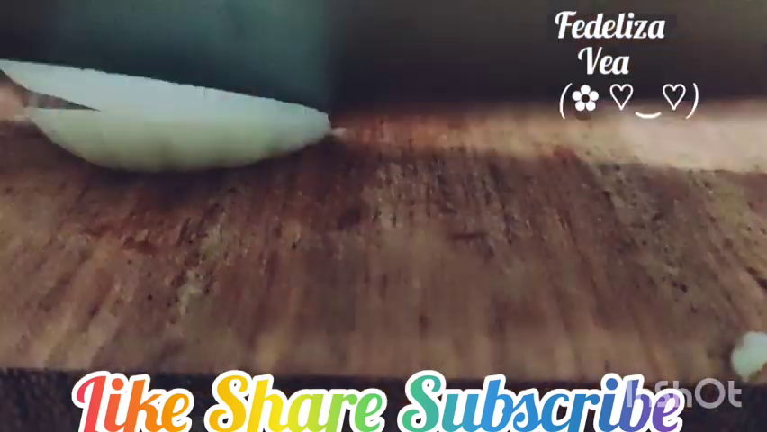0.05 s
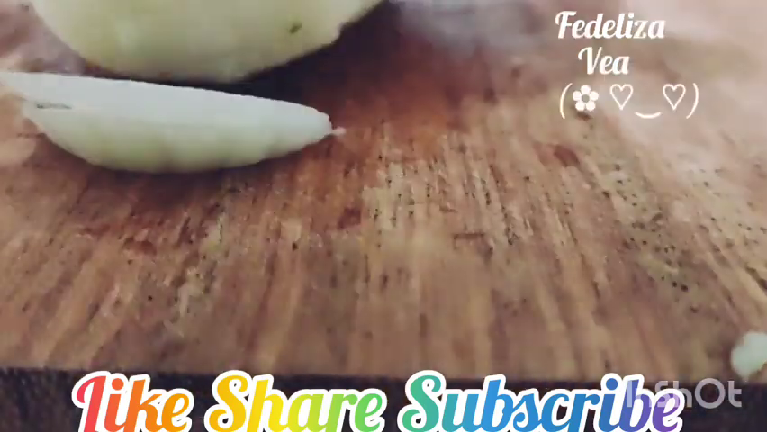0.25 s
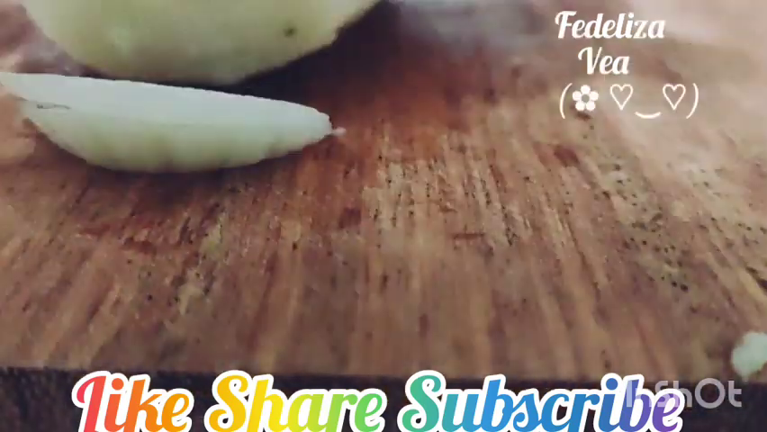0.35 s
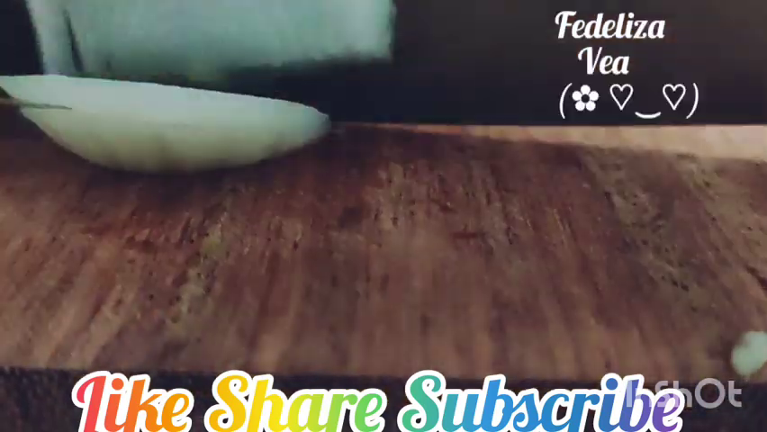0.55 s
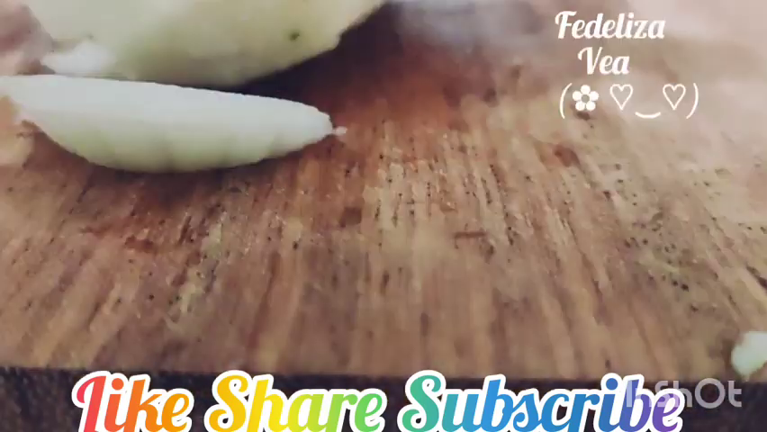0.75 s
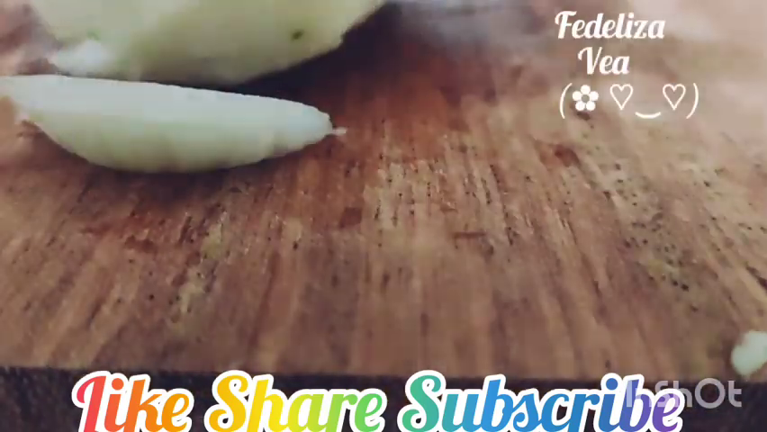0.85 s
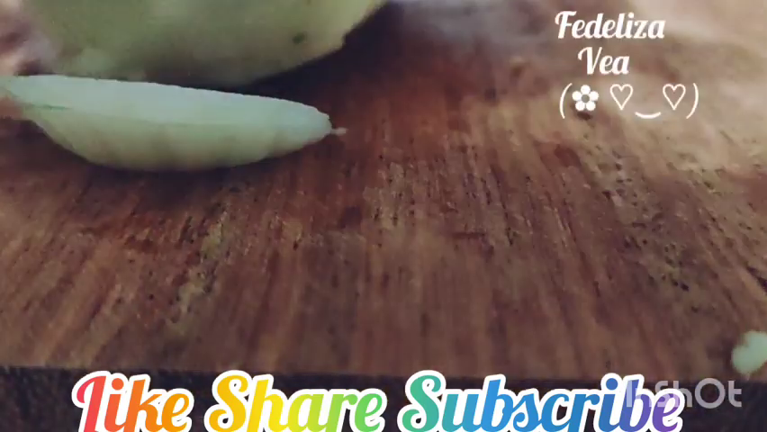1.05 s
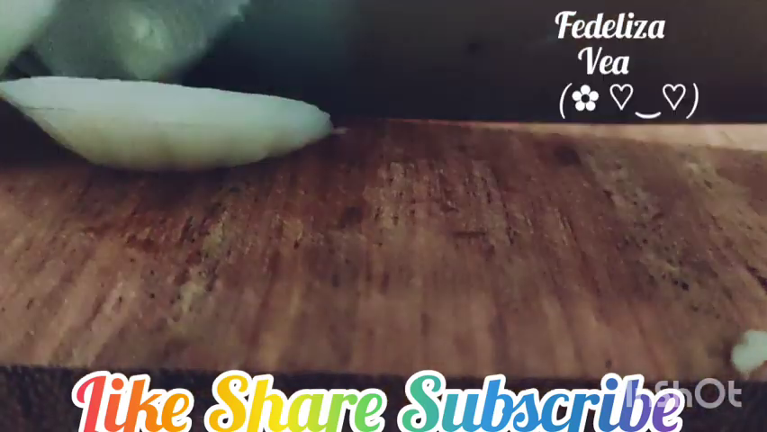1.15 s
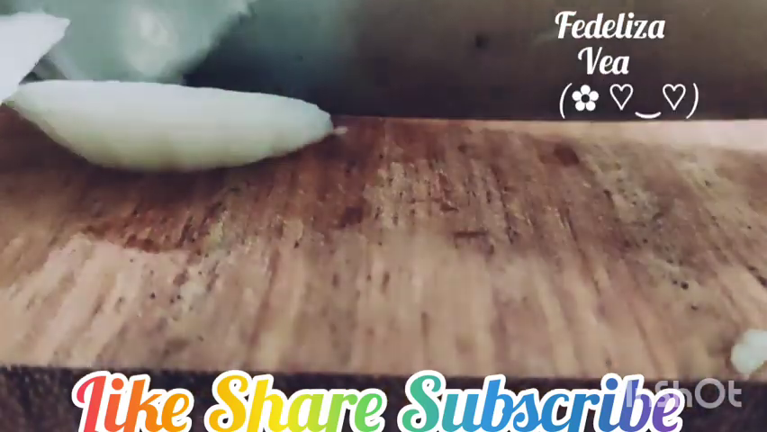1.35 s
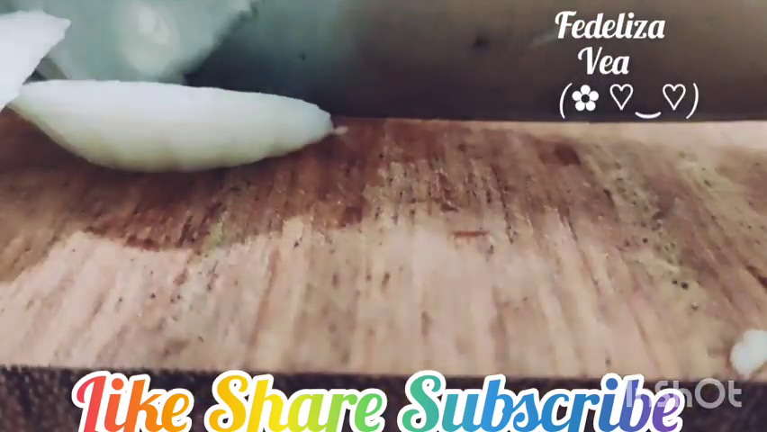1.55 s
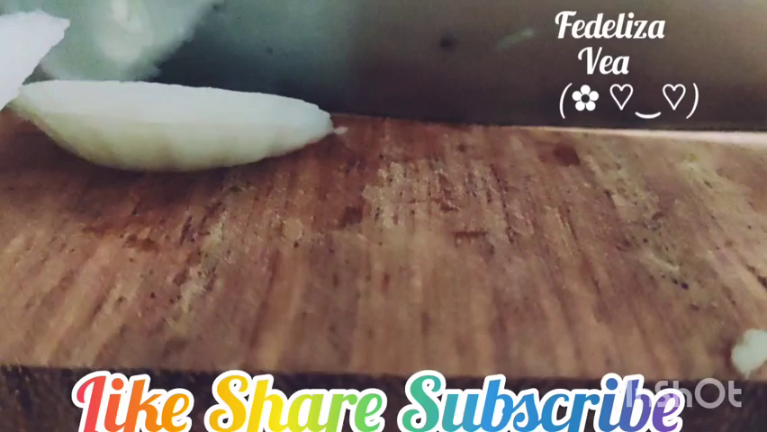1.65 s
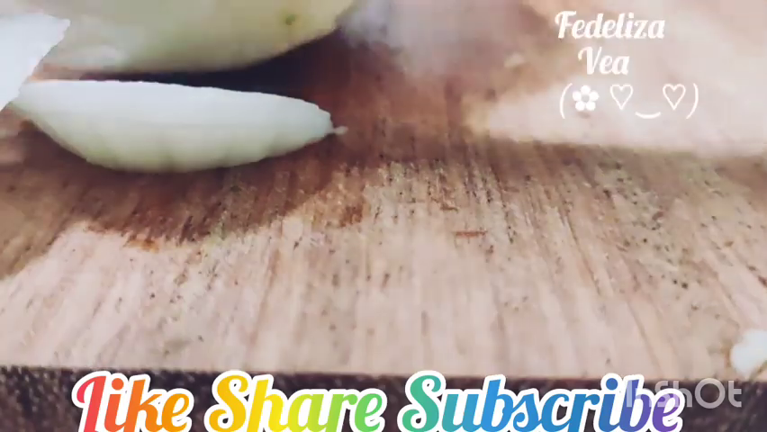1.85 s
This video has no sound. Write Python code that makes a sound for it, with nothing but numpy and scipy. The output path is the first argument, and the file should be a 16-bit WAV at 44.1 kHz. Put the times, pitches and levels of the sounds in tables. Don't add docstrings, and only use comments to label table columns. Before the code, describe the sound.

Close to the board, two crunchy vegetable cuts each end in a hard woody knock and gritty scrape. Slices drop with soft thuds, fingers rustle faintly in peel, and low room hush remains.

```python
import sys
import numpy as np
from scipy import signal
from scipy.io import wavfile
from scipy.ndimage import uniform_filter1d

SR = 44100
rng = np.random.default_rng(int(sys.argv[2]) if len(sys.argv) > 2 else 0)


def gain_from_decibels(decibels):
    exponent = np.asarray(decibels, float) / 20
    return 10 ** exponent


def master(y):
    cut = np.clip(np.atleast_2d(y).T, -1, 1)
    pcm = np.round(cut * 32767)
    wavfile.write(sys.argv[1], SR, pcm.astype(np.int16))


N = 83790
LAG = 9

# (frequency [Hz], width [Hz], level [dB])
BOARD_MODES = [(290, 20, -15), (652.6, 34, -9), (1011.6, 23, -6), (1057.3, 43, 3), (1187, 81, -3),
               (1190, 120, 2), (1366, 200, -11), (1578, 54, -2), (1784.5, 130, -5.5), (1829, 96, -6),
               (2010, 140, -8.5), (2193, 51, -18.5), (798, 53, -15.5)]
# (frequency [Hz], level [dB])
CRUNCH_COLOUR = [(100, -3), (400, -13), (1500, -2.5), (2500, -2.5), (3700, 1), (6000, 4.5), (11000, 5.5),
                 (16500, -9)]


def evened(x):
    return x / np.sqrt(np.mean(x ** 2) + 1e-20)


def colour(x, points):
    f, db = np.transpose(points)
    hz = abs(np.fft.fftfreq(4096, 1 / SR))
    log_gain = np.log(gain_from_decibels(np.interp(np.log(hz + 1), np.log(f), db)))
    minimum_phase = np.exp(log_gain - 1j * signal.hilbert(log_gain).imag)
    taps = np.fft.ifft(minimum_phase).real[:2048]
    return signal.oaconvolve(x, taps[None] if x.ndim > 1 else taps, axes=-1)[..., :N]


def ring(x, modes, low_hz):
    t = np.arange(4000) / SR
    response = np.zeros(len(t))
    for hz, width, db in modes:
        decay = np.exp(-np.pi * width * t)
        soft_start = 1 - np.exp(-4 * np.pi * width * t)
        response += gain_from_decibels(db) * np.sqrt(width) * decay * soft_start * np.sin(2 * np.pi * hz * t)
    response = signal.sosfilt(signal.butter(3, low_hz, "high", fs=SR, output="sos"), response)
    return signal.oaconvolve(x, response[None] / np.linalg.norm(response), axes=1)[:, :N]


def stroke_gain(strokes, column=1):
    t, gain = np.arange(N) / SR, np.zeros(N)
    for rows in strokes:
        r = np.array(rows)
        inside = (t >= r[0, 0]) & (t < r[-1, 0])
        gain[inside] = gain_from_decibels(np.interp(t[inside], r[:, 0], r[:, column]))
    return uniform_filter1d(gain, size=44)


def grains(per_s, spread_db, clump_db, clump_s, shared):
    chance = rng.random((3, N))
    size = np.minimum(rng.exponential(1, (3, N)), 4)
    clump = evened(uniform_filter1d(rng.standard_normal(N), max(int(clump_s * SR), 2)))
    clicks = (chance < per_s / SR) * gain_from_decibels(spread_db * size + clump_db * clump)
    clicks = clicks * rng.choice([-1., 1.], (3, N))
    share = np.clip(shared, 0, 1)
    common = np.array([np.roll(clicks[0], 2 * LAG), clicks[0]])
    mix = np.sqrt(share) * common + np.sqrt(1 - share) * clicks[1:]
    bass_source = np.array([np.roll(clicks[0], LAG), clicks[0]])
    return evened(mix + signal.lfilter(*signal.butter(2, 600, fs=SR), bass_source - mix))


def add(mix, s, sound):
    part = mix[:, max(round(s * SR), 0):][:, :sound.shape[1]]
    part += sound[:, :part.shape[1]]


def hush():
    # (frequency [Hz], level [dB])
    hush_colour = [(25, -20), (80, 1), (210, 4), (800, -11.5), (1200, -18.5), (4000, -23), (9000, -20),
                   (16000, -29)]
    # (frequency [Hz], width [Hz], level [dB])
    machine_tones = [(222.6, 23, -0.5), (130, 6.9, -4.5), (823, 30, -8.5)]
    noise = rng.standard_normal((3, N))
    low = signal.lfilter(*signal.butter(2, 700, fs=SR), noise)
    hiss = noise[:2] - low[:2]
    mix = hiss + np.sqrt(.93) * low[2] + np.sqrt(.07) * low[:2]
    waver = evened(uniform_filter1d(rng.standard_normal(N), 1500))
    gain = gain_from_decibels(-54 + 1.7 * waver - 1.5 * np.arange(N) / SR)
    return gain * (evened(colour(mix, hush_colour)) + gain_from_decibels(-9.5) * evened(ring(mix, machine_tones, 68.8)))


def kitchen(x):
    t = np.arange(SR // 3) / SR
    tail = rng.standard_normal((2, len(t))) * gain_from_decibels(-60 * t / 0.3) * (t > .004)
    tail = signal.lfilter(*signal.butter(1, [500, 4000], "band", fs=SR), tail)
    return signal.fftconvolve(x, tail / np.linalg.norm(tail[0]), axes=1)[:, :N]


def rustles():
    rustle_times = (.085, .14, .19, .62, .692, .732, 1.262, 1.468, 1.51, 1.567, 1.664, 1.677, 1.848, 1.2)
    # (level [dB], length [s])
    puffs = [(-45.5, 0.081), (-67, .04), (-58, 0.019), (-49.5, 0.068), (-48, 0.0058), (-53, 0.056),
             (-54, 0.095), (-56.5, 0.012), (-57.5, 0.027), (-52, 0.062), (-65.5, 0.0073), (-57.5, 0.012),
             (-58, 0.029), (-58, 0.022)]
    # (frequency [Hz], level [dB])
    peel_colour = [(300, -19.5), (1000, -1.5), (2500, -3.5), (4000, -2), (6000, 3), (11000, 1),
                   (16000, -11)]
    t, swell = np.arange(N) / SR, np.zeros(N)
    for s, (db, length) in zip(rustle_times, puffs):
        swell += gain_from_decibels(db) * np.exp(-(2 * (t - s) / length) ** 2)
    return swell * evened(colour(grains(8000, 1.5, 1.38, 0.00395, 0.058), peel_colour))


def thuds():
    thud_times = (.038, .583, .79, .72, 1.83, .92)
    # (level [dB], pitch [Hz], length [s])
    falls = [(-44.5, 215, 0.035), (-43, 198, 0.046), (-50.5, 356, 0.021), (-55, 210, .03),
             (-66, 350, 0.0446), (-53.5, 240, 0.034)]
    out = np.zeros((2, N))
    for s, (db, hz, length) in zip(thud_times, falls):
        t = np.arange(0, length, 1 / SR)
        swing = np.zeros(len(t))
        for k in (1, 1.7, 2.3):
            swing += np.sin(2 * np.pi * k * hz * t * (1 - .2 * t / length)) / k ** 2.5
        swing *= np.sin(np.pi * t / length) ** 1.5
        add(out, s, gain_from_decibels(db + 9) * swing * gain_from_decibels([[-1.5], [1.5]]))
    return out


def sings():
    # (time [s], level [dB], frequency [Hz],
    # time to fall by 60 dB [s])
    thin_tones = [(0.067, -53, 6120, 0.16), (0.134, -64, 6120, 0.15), (.615, -66, 5300, 0.2),
                  (0.723, -61, 5970, 0.2), (1.673, -66, 4750, .12), (1.466, -67, 6090, 0.08),
                  (1.503, -67, 6200, 0.14), (.9695, -35, 4800, .045), (1.562, -67, 950, .08),
                  (.657, -62, 2850, .04)]
    out, t = np.zeros((2, N)), np.arange(6000) / SR
    for (s, db, hz, t60), z in zip(thin_tones, rng.standard_normal((len(thin_tones), 6000))):
        waver = 1 + 0.42 * evened(uniform_filter1d(z, 150))
        tone = np.sin(2 * np.pi * hz * t) * waver
        add(out, s, gain_from_decibels(db + 7.0 - 60 * t / t60) * np.minimum(t / 0.0031, 1) * tone * np.ones((2, 1)))
    return out


def snaps():
    snap_times = (.2105, .2495, .266, .2745, .288, .329, .3522, .3691, .659, .7245, .7698, .7711, .7795,
                  .7908, .857, .8805, .9405, .9690, .9708, 1.0495, 1.249, 1.258, 1.555, 1.5705, 1.654,
                  1.672)
    # (peak level [dB], board share [dB])
    snap_levels = [(-50.5, 3.5), (-40.5, 10), (-41, 4), (-33, -11.5), (-29, -10), (-37.5, -3.5), (-39.5, -1.5),
                   (-35.5, -22.5), (-69, 17), (-56, -11.5), (-32, 3), (-39, 9), (-43.5, 6.5), (-40.5, 9),
                   (-51.5, -15), (-38.5, -9.5), (-36.5, -20), (-21.5, -14), (-46.5, -20), (-23.5, -13),
                   (-68, -19), (-52, -11.5), (-59, -19.5), (-55, -23.5), (-63, -22.5), (-55.5, -27.5)]
    air, wood, t = np.zeros((2, N)), np.zeros((2, N)), np.arange(300) / SR
    burst = (np.exp(-(t / .0011) ** 4) + .2 * gain_from_decibels(-60 * t / .012)) * np.minimum(t / .0003, 1)
    quick = gain_from_decibels(-60 * t / .006)
    for s, (db, share_db), z in zip(snap_times, snap_levels, rng.choice([-1., 1.], (len(snap_levels), 2, 300))):
        add(air, s, gain_from_decibels(db) * burst * z)
        add(wood, s, gain_from_decibels(db + share_db) * burst * quick * z)
    blade = ring(air, [(4770, 170, -5), (6475, 360, -1), (7300, 900, -1.5)], 2010)
    body = ring(wood, [(1680, 240, 7.0), (3350, 700, 9), (1110, 800, -3.5), (2430, 680, -4)], 250)
    return gain_from_decibels(8.0) * blade + gain_from_decibels(8.0) * colour(air, CRUNCH_COLOUR) + gain_from_decibels(16.5) * body


def knocks():
    # (time [s], peak level [dB])
    hits = [
        (0.4091, 4),
        (1.061, 1.5),
    ]
    # (frequency [Hz], level [dB], time to fall by 60 dB [s])
    struck_modes = [(1005, -7.5, .025), (1160, -8, 0.03), (1720, -26, .02), (2820, -19, 0.015),
                    (2340, -10.5, 0.0075), (4140, -13.5, 0.013), (615, -22.5, 0.011), (6200, -29, 0.023),
                    (4830, -11.5, .01)]
    push_lengths = (.00007, .00010)
    bright_db, bounce = (3, -5.5), (0.31, 0.032)
    out, t = np.zeros((2, N)), np.arange(2000) / SR
    choke = .06 + .94 * np.exp(-(t / .003) ** 4)
    for s, db in hits:
        for ch in range(2):
            modes = np.zeros(len(t))
            for hz, d, t60 in struck_modes:
                modes += gain_from_decibels(d + bright_db[ch] * (hz > 1900) - 60 * t / t60) * np.sin(2 * np.pi * hz * t)
            modes = np.roll(modes * choke, 18) * (t > 18 / SR)
            push = np.exp(-((t - 12 / SR) / push_lengths[ch]) ** 2)
            hit = gain_from_decibels(-5.5) * modes - push
            hit = hit + bounce[ch] * np.roll(hit, 78) * (t > 78 / SR)
            low = -gain_from_decibels(-42.5 + 4.5 * ch) * np.sin(np.pi * np.clip(t / 0.0037, 0, 1))
            out[ch, round(s * SR) + LAG * (1 - ch):][:len(t)] += gain_from_decibels(db) * (hit + low)
    return out


def dragging():
    # (time [s], pressure level [dB])
    drags = [
        [(0, -31.5), (.008, -36.5), (.02, -39), (.034, -36), (.052, -53.5), (.084, -54), (.17, -75)],
        [(.411, -24), (.43, -22.5), (.446, -22), (.462, -30), (.484, -36.5), (.498, -26.5), (.54, -37),
         (.6, -59.5), (.66, -59.5)],
        [(1.063, -29), (1.082, -26.5), (1.105, -27), (1.125, -25), (1.143, -24), (1.162, -36), (1.22, -44),
         (1.232, -61), (1.32, -77)],
    ]
    # (frequency [Hz], level [dB])
    grit_colour = [(500, -30), (1300, -4), (2600, -4.5), (5000, -8.5), (7000, -12), (9000, -27.5),
                   (11500, -22.5), (16000, -40)]
    patch_shifts = (-.03, 0, .03)
    pressure = stroke_gain(drags)
    drive = grains(3000, 1.6, 2.6, 0.011, 0.5) * pressure
    wander = uniform_filter1d(rng.standard_normal((len(patch_shifts), N)), size=600, axis=1)
    touched = np.argmax(wander, axis=0)
    wood = np.zeros((2, N))
    for k, shift in enumerate(patch_shifts):
        modes = [(hz * (1 + shift * (hz > 900)), width, db) for hz, width, db in BOARD_MODES]
        wood += ring(drive * (touched == k), modes, 150)
    grit = colour(abs(pressure) ** 0.64 * grains(9000, 2., 1.2, 0.0043, 0.29), grit_colour)
    return gain_from_decibels(3) * (wood + gain_from_decibels(-12.0) * grit)


def slicing():
    # (time [s], crunch level [dB], board share [dB])
    strokes = [
        [(.209, -40, 10), (.232, -32, -2.5), (.264, -28.5, -6), (.3, -34.5, -21.5), (.338, -35, -11),
         (.37, -32, -25), (.39, -36, -18), (.4095, -32, -8.5)],
        [(.756, -45, 4), (.763, -38.5, -1), (.7692, -42, -9.5), (.771, -29.5, -6), (.804, -31.5, -9),
         (.862, -33, -10), (.95, -34, -40), (1.016, -33.5, -19), (1.045, -33, -12.5), (1.0615, -29, -12.5)],
    ]
    # (frequency [Hz], width [Hz], level [dB])
    blade_modes = [(4580, 90, -15.5), (5620, 15, -3.5), (6230, 77, 4), (6490, 40, -3), (7000, 34, -5)]
    go = stroke_gain(strokes)
    tears = abs(grains(120, 8.2, 0.97, 0.067, 0.96))
    tears = signal.oaconvolve(tears, np.hanning(90)[None], "same", axes=1)
    cells = grains(12000, 2.6, 1.5, 0.0049, 0.044) * (1 + evened(tears) / 8)
    crunch = evened(colour(cells, CRUNCH_COLOUR)) * go
    crunch = crunch + gain_from_decibels(-14) * ring(cells * go, blade_modes, 3000)
    shaking = grains(4900, 6.1, 6.9, 0.0035, 0.18) * go * stroke_gain(strokes, column=2)
    push = ring(shaking, BOARD_MODES + [(1730, 280, 6)], 150)
    return gain_from_decibels(4.5) * (crunch + gain_from_decibels(-7) * push)


def scene():
    near = slicing() + dragging() + knocks() + snaps() + thuds() + rustles() + sings()
    return near + gain_from_decibels(-16) * kitchen(near) + hush()


def roll_off(x):
    return signal.sosfilt(signal.butter(12, 16940, fs=SR, output="sos"), x)


def record(dry):
    # (frequency [Hz], level [dB])
    left_port = [(30, -12), (300, -7), (4000, -4), (6100, -0.5), (7300, -4.5), (8500, -20.5), (10500, -49),
                 (15000, -13.5)]
    right_port = [(30, -14.5), (300, -5), (4000, -4.5), (6500, -21), (7700, -23), (9300, -16.5),
                  (10900, -8), (13000, -14)]
    noise = signal.lfilter(*signal.butter(2, 11000, fs=SR), rng.standard_normal(dry.shape))
    ports = np.array([colour(dry[0], left_port), colour(dry[1], right_port)]) + gain_from_decibels(-81) * noise
    band_limit = signal.firwin(63, 15950, fs=SR)
    ports = signal.oaconvolve(ports, band_limit[None], "same", axes=1)
    return roll_off(ports)


dry = scene()
out = record(dry)
master(out)
```